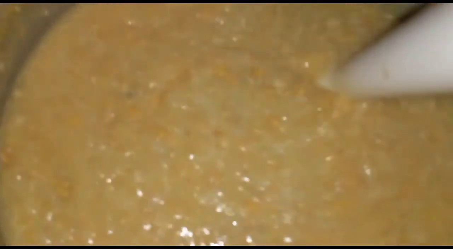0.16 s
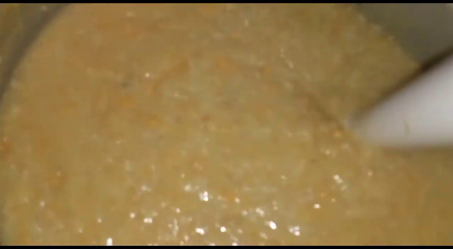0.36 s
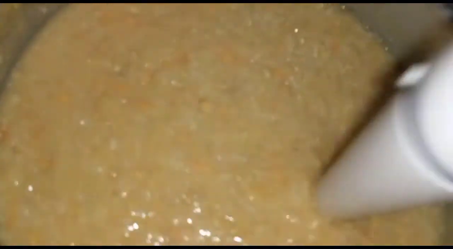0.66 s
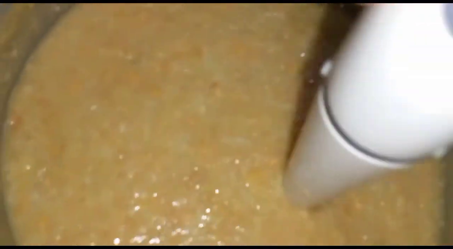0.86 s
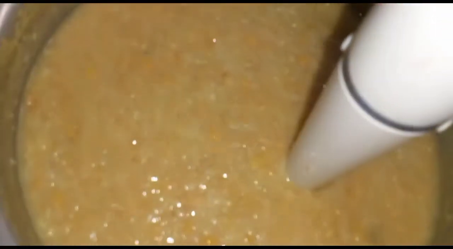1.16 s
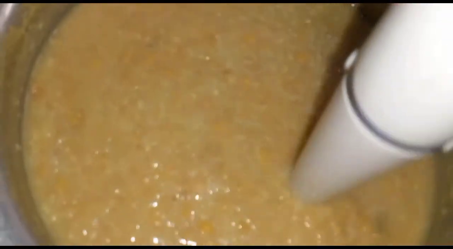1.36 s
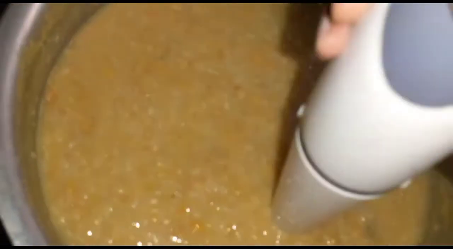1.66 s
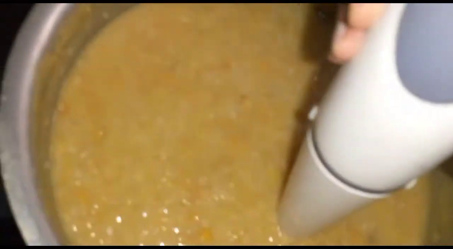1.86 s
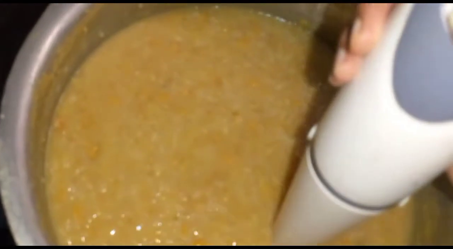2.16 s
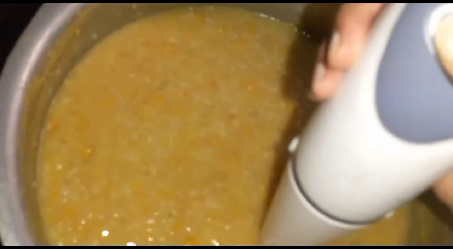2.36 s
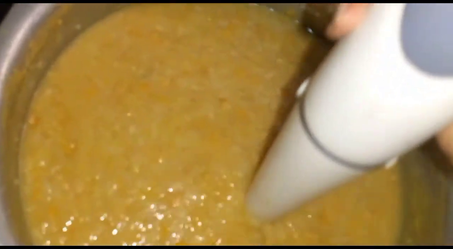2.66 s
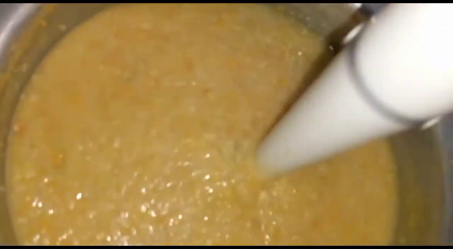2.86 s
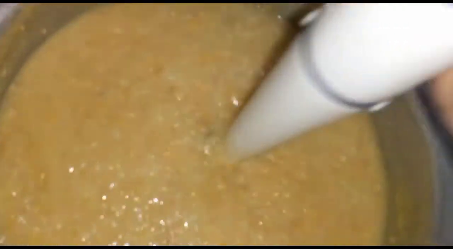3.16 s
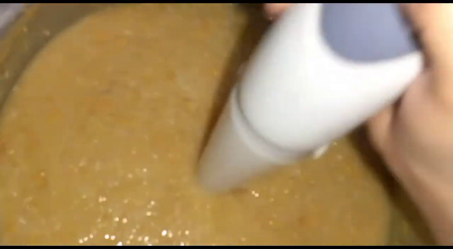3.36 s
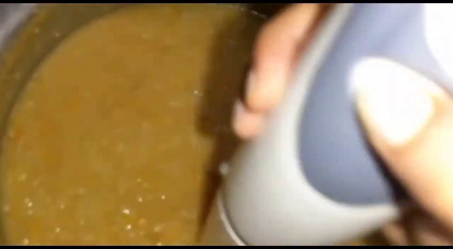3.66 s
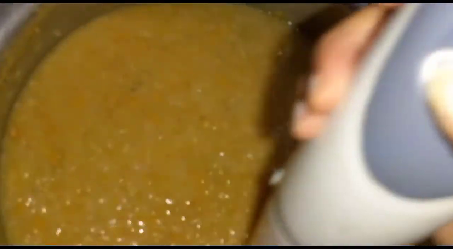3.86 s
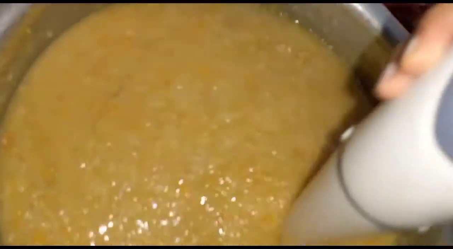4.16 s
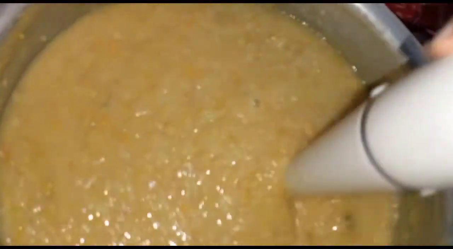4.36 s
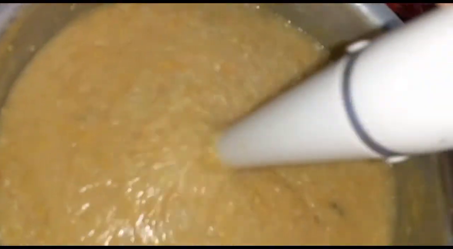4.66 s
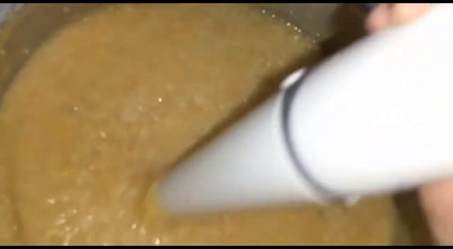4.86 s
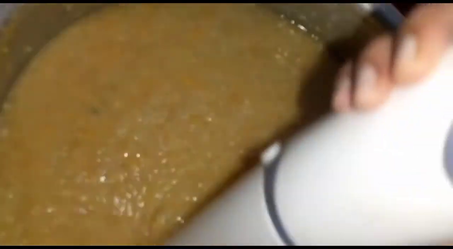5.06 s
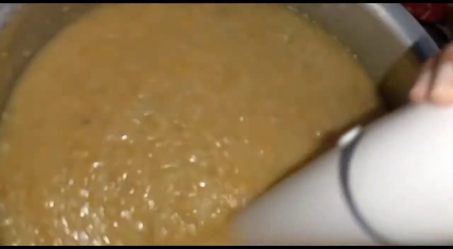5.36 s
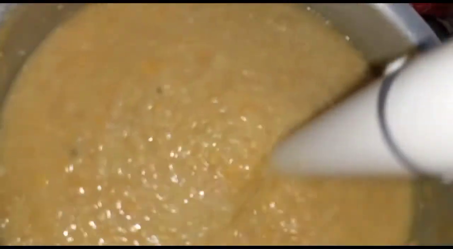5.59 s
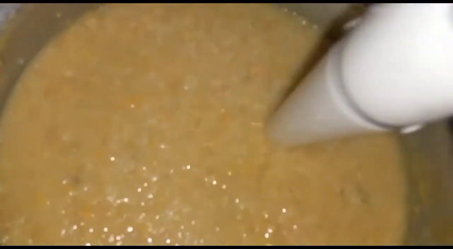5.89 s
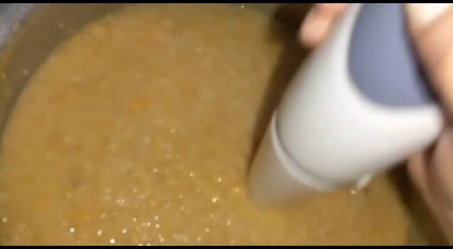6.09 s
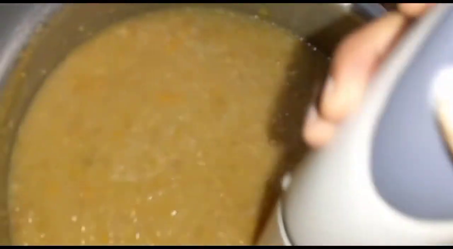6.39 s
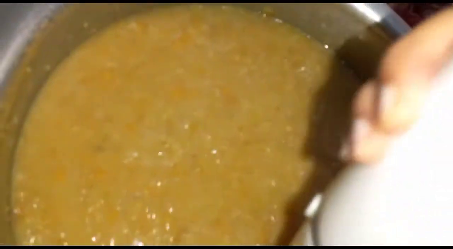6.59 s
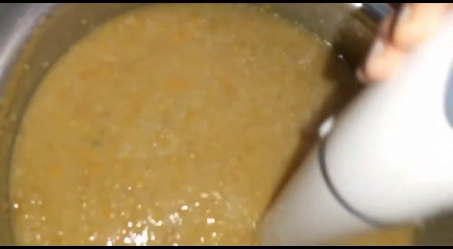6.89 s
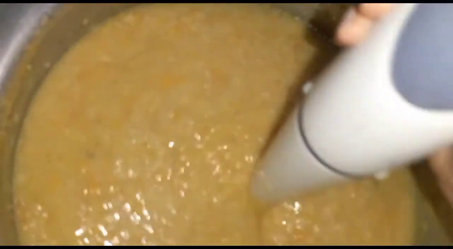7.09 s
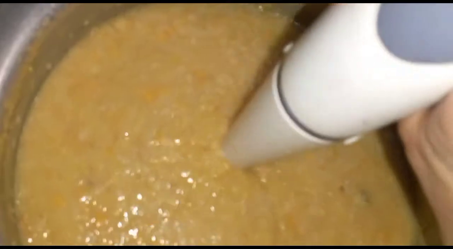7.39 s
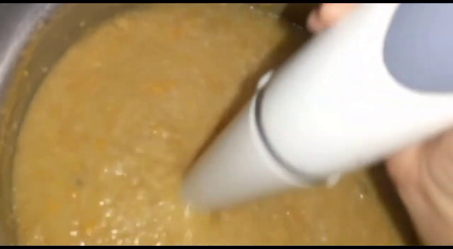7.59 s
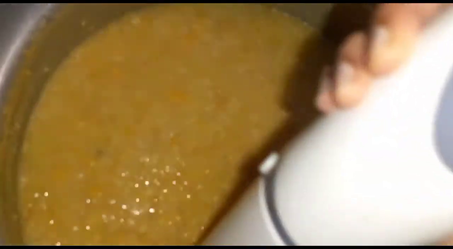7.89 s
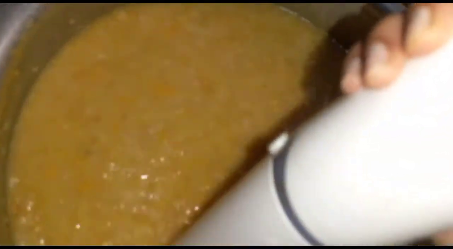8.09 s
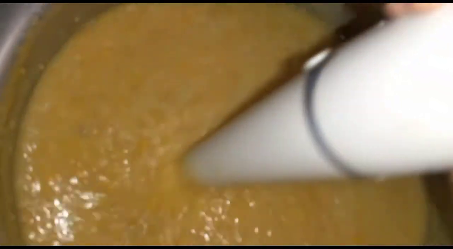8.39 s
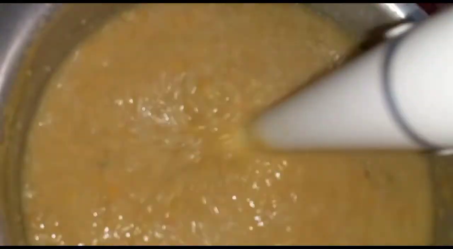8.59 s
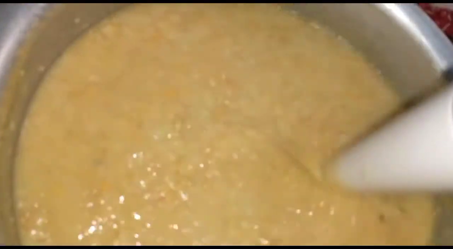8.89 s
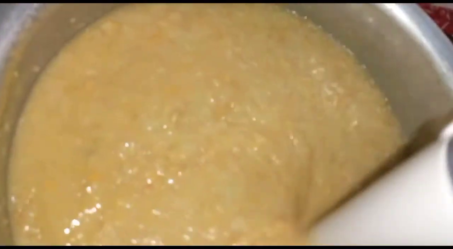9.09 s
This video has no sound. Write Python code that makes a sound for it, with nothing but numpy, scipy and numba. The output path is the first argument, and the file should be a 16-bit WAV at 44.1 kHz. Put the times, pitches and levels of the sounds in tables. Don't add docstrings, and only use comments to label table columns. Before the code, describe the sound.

Four runs of a stick blender in a pot of puree: a short ending, a pause of nearly three seconds, then three bursts of growing length. Each bites in abruptly and quickly runs down. The sound is a rough, hollow mid-range roar with a steady motor hum, wet spray and fine brush hiss, recorded close in a small quiet kitchen.

```python
import sys
import numpy as np
from scipy import signal
from scipy.fft import rfft, irfft, next_fast_len
from scipy.io import wavfile
from scipy.ndimage import uniform_filter1d
from numba import njit

SR = 44100
rng = np.random.default_rng(int(sys.argv[2]) if len(sys.argv) > 2 else 0)


def waveform_to_disk(signal):
    frames = np.transpose(np.atleast_2d(signal))
    scaled = np.clip(frames, -1, 1) * 32767
    samples = np.round(scaled).astype(np.int16)
    wavfile.write(sys.argv[1], SR, samples)


def gain_from_decibels(decibels):
    exponent = np.asarray(decibels, float) / 20
    return 10 ** exponent


N = 407484
TIME = np.arange(N) / SR

# (on [s], off [s], power of the tone fade while coasting)
BUTTON = [
    (-.5, .475, 2.),
    (3.325, 4.49, 5.),
    (4.941, 6.33, 5.),
    (6.75, 9.095, 5.),
]
# (time [s], peak level [dB])
DROPLETS = [(0.0668, -33.5), (0.112, -20), (3.3236, -37), (4.001, -30), (4.2914, -14.5), (4.4698, -22),
            (4.9405, -35), (4.982, -37), (5.0408, -31), (5.1123, -17.5), (5.462, -25), (5.592, -18),
            (5.66, -32), (5.705, -12.5), (5.7728, -20.5), (5.835, -46), (6.7488, -54), (7.0108, -40),
            (7.057, -12.5), (7.872, -38), (7.986, -25), (8.0471, -43), (8.081, -29), (8.214, -20),
            (8.835, -34), (8.8738, -28.5)]


def rms_one(x):
    return x / np.sqrt(np.mean(x ** 2) + 1e-20)


def in_time(rows):
    s, *columns = np.transpose(rows)
    return [np.interp(TIME, s, column) for column in columns]


def colour(x, spectrum):
    hz, db = np.transpose(spectrum)
    size = next_fast_len(N)
    bin_hz = np.arange(size // 2 + 1) * SR / size
    shape = np.interp(np.log(bin_hz + 1), np.log(hz), gain_from_decibels(db), left=0, right=0)
    return rms_one(irfft(rfft(x, size) * shape, size)[:N])


def drift(rate):
    r = np.exp(-80 * np.pi * rate / SR)
    slow = signal.lfilter([1], [1, -2 * r, r * r], rng.standard_normal(N // 40 + 2002))[2000:]
    return np.interp(np.arange(N) / 40, np.arange(len(slow)), rms_one(slow))


@njit
def resonate(x, turn, r):
    y = np.zeros(len(x))
    for i in range(2, len(x)):
        drive = (1 - r * r) / 2 * (x[i] - x[i - 2])
        y[i] = drive + 2 * r * np.cos(turn[i]) * y[i - 1] - r * r * y[i - 2]
    return y


def resonance(x, hz, width_hz):
    return rms_one(resonate(x, 2 * np.pi * hz * np.ones(N) / SR, np.exp(-np.pi * width_hz / SR)))


def lumps(per_s, spread_db):
    sizes = gain_from_decibels(spread_db * np.minimum(rng.exponential(1, N), 5)) * rng.choice([-1, 1], N)
    return rms_one(sizes * (rng.random(N) < per_s / SR))


def speed_share():
    spin_up_s, run_down_s = .03, .13
    share, loud = np.zeros((2, N))
    for on, off, fade in BUTTON:
        rise = 1 - np.exp(-np.maximum(TIME - on, 0) / spin_up_s)
        coast = np.exp(-np.maximum(TIME - off, 0) / run_down_s)
        share = np.maximum(share, rise * coast)
        loud = np.maximum(loud, rise ** 5 * coast ** fade)
    return share, loud


def hand():
    # (time [s], load [dB], pot coupling [dB], nearness to the surface [dB],
    # motor housing towards the microphone [dB])
    curves_1 = [(0, -14, 0.5, -21.5, -52), (.032, -18.5, -1, -14.5, -53), (.126, -18.5, -6, -13, -41.5),
                (.3, -18.5, -1.5, -13.5, -42), (.49, -16.5, 0.5, -17, -55)]
    curves_2 = [(3.368, 0.5, 7.5, -17.5, -47), (3.4, -8, -1, -11, -47), (3.53, -14, -16.5, -9.5, -45),
                (3.64, -15.5, 2, -12, -50), (3.74, -16, -2, -14, -59), (3.95, -17, 3.5, -16, -49.5),
                (4.2, -18.5, 1, -12.5, -60), (4.36, -17, -4, -11.5, -55), (4.49, -19, 4.5, -14.5, -56)]
    curves_3 = [(5.0, -20.5, 5.5, -16, -53), (5.16, -19, 5, -14, -52.5), (5.33, -14, 0.5, -18, -53),
                (5.52, -16.5, 1, -13.5, -57), (5.75, -18, 4, -14.5, -50), (5.919, -18, -1.5, -14.5, -54),
                (6.028, -15.5, 2, -8.5, -55), (6.25, -18, -0.5, -9, -54), (6.33, -19, 2.5, -12, -57)]
    curves_4 = [(6.82, -17, 1.5, -21.5, -52), (7.04, -16, 5, -11, -55), (7.27, -20, -2, -8.5, -52.5),
                (7.6, -19.5, 0.5, -11, -56.5), (7.77, -19.5, 5.5, -17.5, -57), (8.0, -21, 6.5, -14.5, -54),
                (8.2, -18.5, 3.5, -19, -53.5), (8.85, -18.5, 0, -14, -49), (9.1, -20, 2.5, -18.5, -55)]
    # (pot cavity at the start [Hz], at the end [Hz], mist re spray [dB], guard ring [dB])
    burst_colours = [
        (526, 580, -9, -7),
        (555, 633, -9, 1.5),
        (562, 530, -10, 0.5),
        (509, 498, -8, 4.5),
    ]
    # (bite-in [s], lag of the tail [s], fall of the tail [dB per s])
    burst_edges = [
        (.02, 0.033, 98.5),
        (0.014, 0.0067, 100.5),
        (0.015, 0.011, 99),
        (0.024, 0.036, 108),
    ]
    bite_in_db, knee_s = 41, 0.018
    settled_hz, settle_s = 557, 0.087
    curves = (curves_1, curves_2, curves_3, curves_4)
    out = np.zeros((9, N))
    for (on, off, _), rows, sound, edges in zip(BUTTON, curves, burst_colours, burst_edges):
        start_hz, end_hz, mist_db, ring_db = sound
        bite_s, lag, fall = edges
        attack_db = -bite_in_db * np.exp(-np.maximum(TIME - on, 0) / bite_s)
        tail_db = -fall * knee_s * np.logaddexp(0, (TIME - off - lag) / knee_s)
        cavity_hz = np.interp(TIME, [on, off, off + settle_s], [start_hz, end_hz, settled_hz])
        values = in_time(rows) + [cavity_hz, mist_db, ring_db, attack_db, tail_db]
        for row, value in zip(out, values):
            row[:] = np.where(TIME >= on, value, row)
    return out


def touches():
    # (order [tones per turn], level [dB])
    free_tones = [(1, -44), (1.5, -52), (2, -44.5), (3, -48), (5, -71)]
    # (time [s], length [s], level [dB])
    contacts = [
        [(.08, 0.38, -34.5), (3.38, 0.28, -36), (4.22, 0.33, -34.5), (5.2, .32, -43.5), (5.85, .55, -37.5),
         (7.25, 0.18, -35.5), (7.6, 0.45, -42.5), (8.13, 0.706, -29), (8.87, 0.27, -26.5)],
        [(.07, 0.12, -34), (3.79, 0.35, -33.5), (5.3, 0.11, -29), (5.73, 0.091, -30.5), (6.06, 0.54, -42),
         (6.82, 0.36, -32.5), (7.58, 0.16, -28.5)],
        [(-.05, 0.51, -29), (3.36, 0.28, -25.5), (3.8, 0.36, -29.5), (4.98, 0.65, -29), (5.92, .45, -28),
         (6.92, 0.074, -30.5), (7.72, 0.29, -23.5), (8.02, 0.38, -21.5), (8.42, 0.48, -23), (9.02, .2, -25.5)],
        [(.07, .3, -26.5), (3.38, 0.35, -32), (5.2, 0.45, -22.5), (5.95, 0.18, -30.5), (7.14, 0.16, -36),
         (7.59, .1, -25), (8.03, 0.87, -34)],
        [(3.377, .18, -17)],
    ]
    edge_s = 0.033

    def step_at(s):
        return .5 + .5 * np.tanh((TIME - s) / edge_s)

    levels_db = []
    for (_, free_db), rows in zip(free_tones, contacts):
        free = gain_from_decibels(free_db + 1.3 * drift(12))
        touching = sum(gain_from_decibels(db) * step_at(s) * (1 - step_at(s + length)) for s, length, db in rows)
        levels_db.append(20 * np.log10(free + touching))
    return levels_db


def shaft(turns, loud, levels_db):
    tones = 0
    for order, db in zip((1, 1.5, 2, 3, 5), levels_db):
        tones = tones + gain_from_decibels(db + 2.2 * drift(18)) * np.sin(2 * np.pi * order * turns)
    return np.sqrt(2) * loud * tones


def churn(turns, share, spectrum, modes, level_db, cavity_hz, width_hz, cavity_db, pulse_db, beat):
    strikes = lumps(per_s=2500, spread_db=1.5) * share + rng.standard_normal(N) * (1 - share)
    two_blades = 1 + beat * share * np.cos(4 * np.pi * turns)
    strikes = strikes * two_blades * gain_from_decibels(0.87 * share * drift(22))
    body = strikes + gain_from_decibels(cavity_db) * resonance(strikes, cavity_hz, width_hz)
    for hz, mode_width_hz, db in modes:
        body = body + gain_from_decibels(db - 12 + 2.5 * drift(3)) * resonance(strikes, hz, mode_width_hz)
    pulses = colour(np.diff(np.floor(turns), prepend=0), spectrum)
    body = colour(body, spectrum) + gain_from_decibels(pulse_db + 2 * drift(10)) * share ** 4 * pulses
    return gain_from_decibels(level_db) * body / np.sqrt(uniform_filter1d(body ** 2, 8000))


def pot_rumble(level_db):
    # (frequency [Hz], level per Hz [dB])
    rumble_spectrum = [(40, -30.5), (60, -33), (100, 10.5), (150, 19), (190, -17.5)]
    return gain_from_decibels(level_db + 1.2 * drift(5)) * colour(rng.standard_normal(N), rumble_spectrum)


def spray(level_db, mist_db, near_db):
    # (frequency [Hz], level per Hz [dB])
    splash_spectrum = [(1900, -37), (2450, 0.5), (2800, 0), (3700, -5.5), (4500, -8), (5000, -31),
                       (5800, -41.5)]
    mist_spectrum = [(4400, -35), (5100, 0), (5800, -2), (6400, -4.5), (7350, -1.5), (7700, -12),
                     (10500, -16.5), (13000, -28)]
    # (frequency [Hz], width [Hz], level [dB])
    slot_modes = [(2550, 200, -5), (3700, 260, -4), (4600, 300, -6), (6400, 450, -1)]
    fizz = lumps(per_s=6000, spread_db=2.6) * gain_from_decibels(.9 * drift(25))
    ring_db = np.clip(1.4 * near_db - 19, -22, -9)
    rings = 0
    for hz, width_hz, db in slot_modes:
        rings = rings + gain_from_decibels(db + ring_db + 2 * drift(2.5)) * resonance(fizz, hz, width_hz)
    fizz = fizz + rings
    return gain_from_decibels(level_db) * (colour(fizz, splash_spectrum) + gain_from_decibels(mist_db) * colour(fizz, mist_spectrum))


def hiss_swell():
    swell_db, swell_s = 5.5, .05
    swells = sum(gain_from_decibels(.4 * (db + 22.5)) * np.exp(-np.abs(TIME - s) / swell_s) for s, db in DROPLETS)
    return swell_db * np.tanh(swells)


def motor(speed, share, level_db):
    # (frequency [Hz], level per Hz [dB])
    hiss_spectrum = [(7300, -29.5), (7800, -0.5), (9000, -4.5), (11000, 4.5), (13000, 6.5), (14600, 5),
                     (15500, -0.5), (15700, -36.5)]
    # (order [tones per turn], rms level [dB])
    whistles = [(48, -62), (71.5, -59)]
    hiss = colour(rng.standard_normal(N) + .4 * lumps(per_s=900, spread_db=3), hiss_spectrum)
    out = gain_from_decibels(level_db + 1.5 * drift(35)) * hiss
    load_db = -.45 * np.maximum(speed - 201, 0)
    for order, db in whistles:
        whistle = resonance(rng.standard_normal(N), order * speed, width_hz=200)
        out = out + gain_from_decibels(db + load_db * (order > 60) + 3 * drift(5)) * share ** 4 * whistle
    return out


def ticks():
    # (time [s], peak level [dB], frequency [Hz])
    pot_knocks = [
        (.709, -35, 4000),
        (.728, -36, 2500),
        (.8785, -29, 600),
        (.879, -30, 1100),
        (.8795, -39, 3300),
        (.891, -38, 500),
        (.8915, -44, 3000),
        (.901, -38, 250),
        (6.045, -38, 70),
        (6.668, -33, 300),
    ]
    out, age = np.zeros(N + 2000), np.arange(1300) / SR
    bright = signal.butter(2, [8500, 14500], "band", fs=SR, output="sos")
    burst = np.exp(-np.abs(age - .0013) / .0002)
    echo = .55 * np.exp(-np.abs(age - .003) / .0003)
    shape = burst + echo + .2 * np.exp(-age / .003)
    for s, db in DROPLETS:
        snap = signal.sosfilt(bright, rng.standard_normal(len(age)) * shape)
        out[round(s * SR):][:len(age)] += gain_from_decibels(db - 7) * snap / np.abs(snap).max()
    for s, db, hz in pot_knocks:
        knock = np.sin(2 * np.pi * hz * age) * np.exp(-age * hz / 1.5)
        out[round(s * SR):][:len(age)] -= gain_from_decibels(db - 1) * knock
    return out[:N]


def kitchen(share):
    # (time [s], level [dB])
    gain_curve = [(0, -2), (.9, -6.5), (1.5, -13.5), (1.75, -7.5), (1.95, -1.5), (2.3, 0.5), (3.3, 1.5),
                  (3.45, 5), (4.9, -8.5), (9.24, 2)]
    # (frequency [Hz], rms level [dB])
    hum_lines = [(48.8, -59), (97.5, -62), (146.3, -51), (196, -65), (292.5, -63), (487.7, -70),
                 (2584, -78)]
    # (frequency [Hz], level per Hz [dB])
    air_spectrum = [(35, -14), (70, -9), (125, -0.5), (200, 0.5), (330, -6.5), (600, -6), (780, -15.5),
                    (1200, -10), (1600, -14.5), (7300, -16), (7700, -23), (13000, -17.5), (15500, -19),
                    (15700, -39.5)]
    air_db, = in_time(gain_curve)
    hum_db = 1.2 * air_db - 1.5 * uniform_filter1d(share, size=20000)
    hum = 0
    for phase, (hz, db) in enumerate(hum_lines):
        hum = hum + gain_from_decibels(db + 1.9 * drift(0.71)) * np.sin(2 * np.pi * hz * TIME + phase)
    air = colour(rng.standard_normal(N), air_spectrum) * gain_from_decibels(-54 + 0.47 * drift(5))
    return np.sqrt(2) * gain_from_decibels(hum_db) * hum + gain_from_decibels(air_db) * air


def scene():
    # (time [s], speed [turns per s])
    speed_curve = [(0, 195.5), (.24, 199.4), (.48, 197.6), (3.42, 195.1), (3.63, 201), (4.27, 213.5),
                   (4.48, 208.8), (5.04, 199), (5.3, 201.3), (5.89, 198.4), (6.32, 213), (6.86, 203.8),
                   (7.08, 204.4), (7.3, 212.2), (7.53, 213.3), (7.75, 205), (8.19, 201.2), (9.08, 201.5)]
    # (frequency [Hz], level per Hz [dB])
    pot_spectrum = [(130, -24.5), (170, -9), (250, 0.5), (400, 5), (620, -3.5), (800, -0.5), (1100, -31)]
    guard_spectrum = [(600, -22.5), (800, 0.5), (1200, -2.5), (1500, 0), (2000, -1.5), (2500, -6.5),
                      (3200, -14)]
    # (frequency [Hz], width [Hz], level [dB])
    pot_modes = [(269, 84, 4), (466, 18, -3.5), (524, 5.4, -11), (553.8, 11, 7.5), (623, 55, 8.5)]
    guard_modes = [(991, 35, -4), (1095, 42, 1.5), (1190, 29, -16), (1280, 90, -1), (1484, 450, 1)]
    spray_tail, hiss_tail, rumble_tail = 0.99, 1, 0.54
    tail_ring = 0.11

    share, loud = speed_share()
    full_speed, = in_time(speed_curve)
    speed = full_speed * share * (1 + .003 * drift(8))
    turns = np.cumsum(speed) / SR
    load_db, pot_db, surface_db, hiss_db, pot_hz, mist_db, ring_db, attack_db, tail_db = hand()
    near_db = surface_db + 12
    ring_db = ring_db + 0.54 * (load_db + 18.5) - 0.63 * near_db
    ring_db = ring_db - tail_ring * tail_db + 1.34 * drift(2.5)
    spray_db = load_db + surface_db + 0.816 * attack_db
    load_db = load_db + attack_db
    pulse_db = -22.5 + 0.53 * near_db

    pot = churn(turns, share, pot_spectrum, pot_modes, load_db + pot_db + tail_db - 2.5,
                cavity_hz=pot_hz + 22 * drift(3.8), width_hz=110,
                cavity_db=2 - tail_ring * tail_db, pulse_db=pulse_db - 7, beat=0.16)
    guard = churn(turns, share, guard_spectrum, guard_modes, load_db + tail_db,
                  cavity_hz=1184 + 25 * drift(3.1), width_hz=61,
                  cavity_db=ring_db - 5.5, pulse_db=pulse_db, beat=0.13)
    free_db = 0.5 * (full_speed - 199.5)
    rumble = pot_rumble(load_db - 32 + free_db + rumble_tail * tail_db)
    mist_db = mist_db + 0.17 * near_db + 1.5 * drift(3.5)
    splash = spray(spray_db + spray_tail * tail_db - 1, mist_db, near_db)
    brushes = motor(speed, share, hiss_db + attack_db + hiss_tail * tail_db + hiss_swell())
    blender = shaft(turns, loud, touches()) + pot + guard + rumble + splash + brushes
    return (blender * (share > 1e-3) + ticks() + kitchen(share))[None]


def low_pass(x):
    return signal.sosfilt(signal.butter(12, 15720, fs=SR, output="sos"), x)


def record(dry):
    top = 1.3
    low_cut = signal.butter(4, 42, "high", fs=SR, output="sos")
    rounded = top * np.tanh(dry / top)
    return low_pass(signal.sosfilt(low_cut, rounded))


dry = scene()
out = record(dry)
waveform_to_disk(out)
```